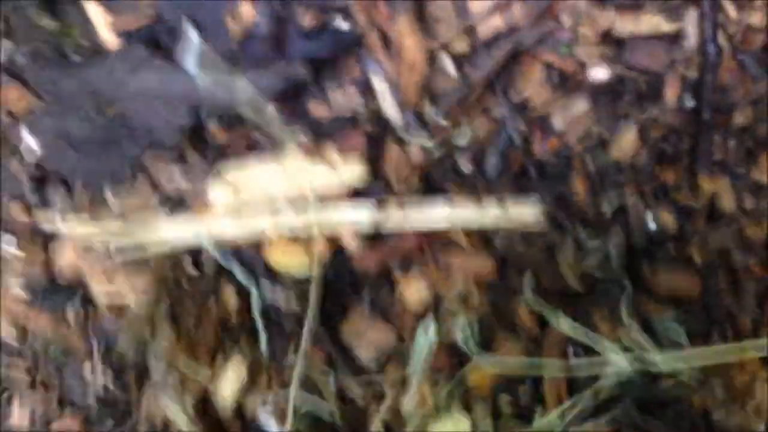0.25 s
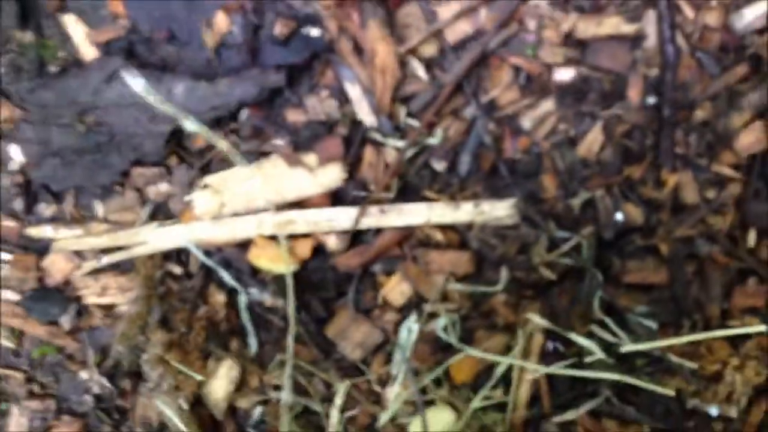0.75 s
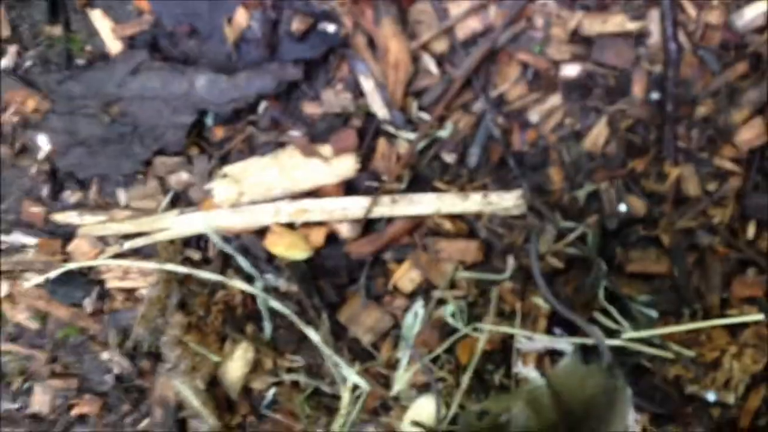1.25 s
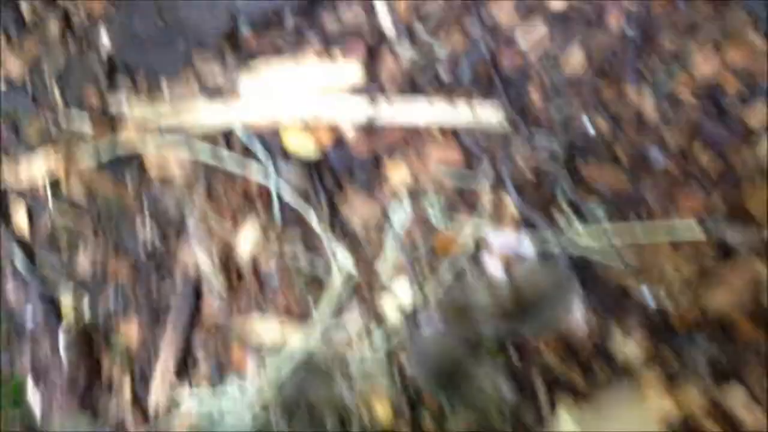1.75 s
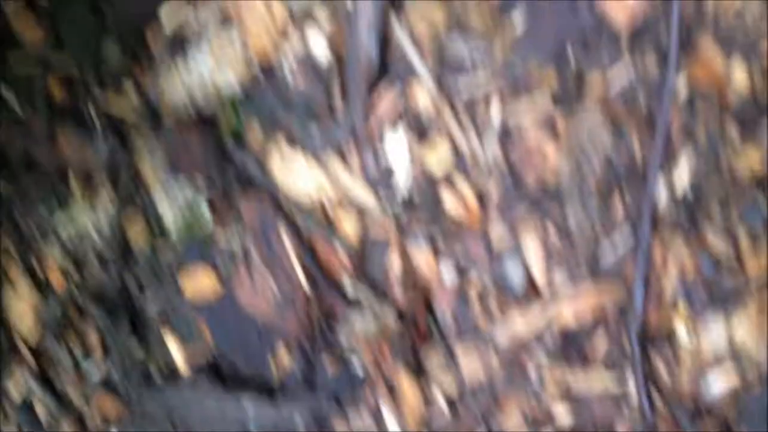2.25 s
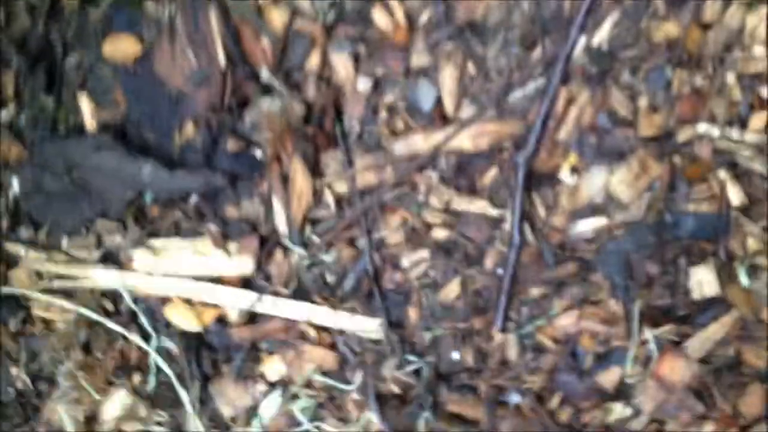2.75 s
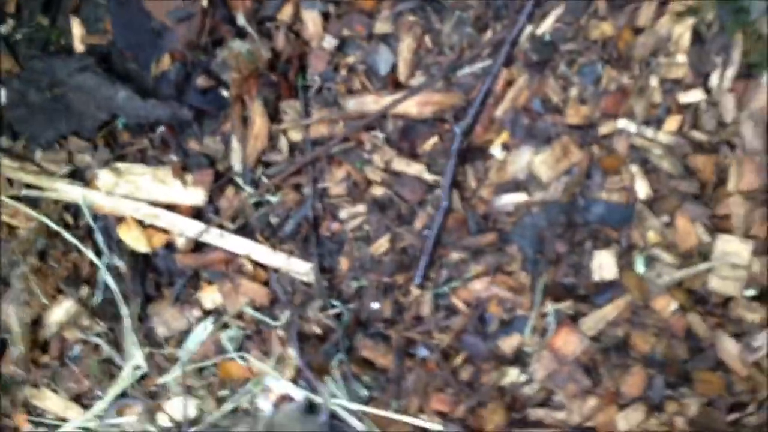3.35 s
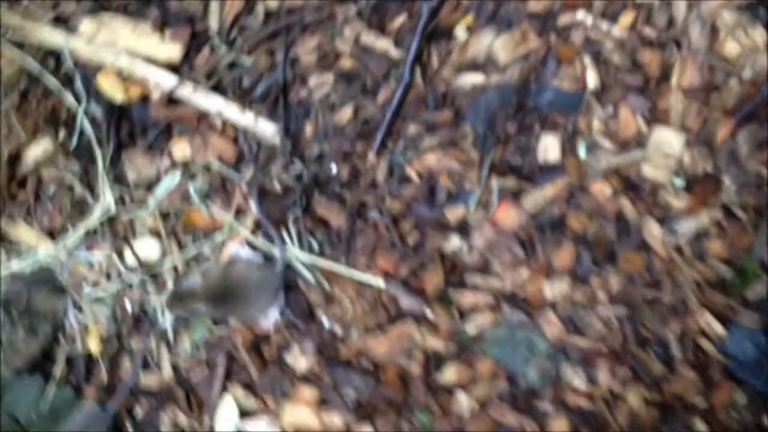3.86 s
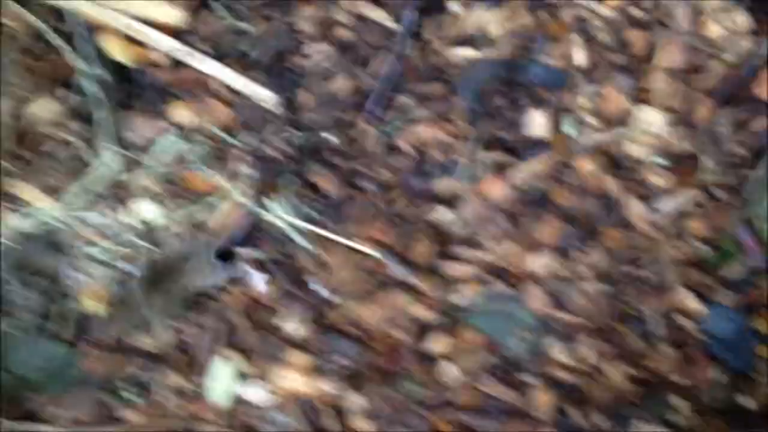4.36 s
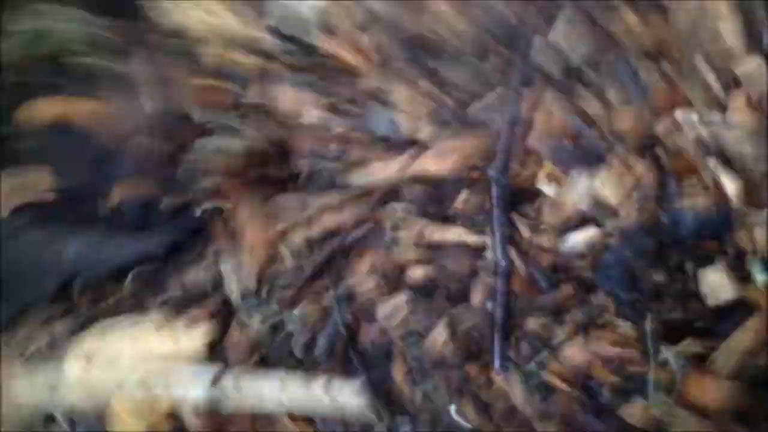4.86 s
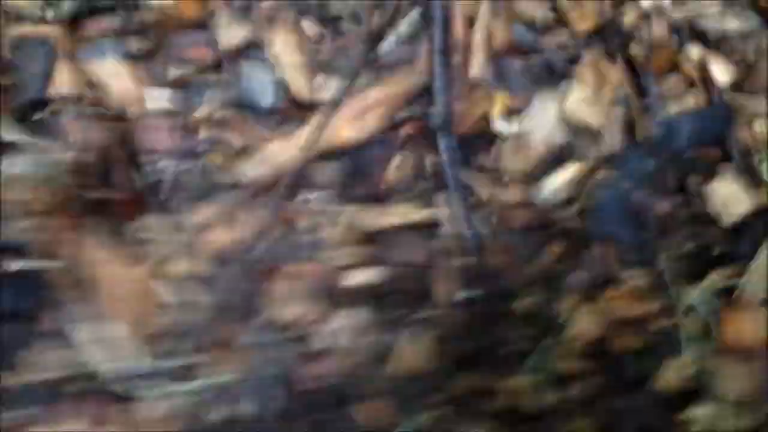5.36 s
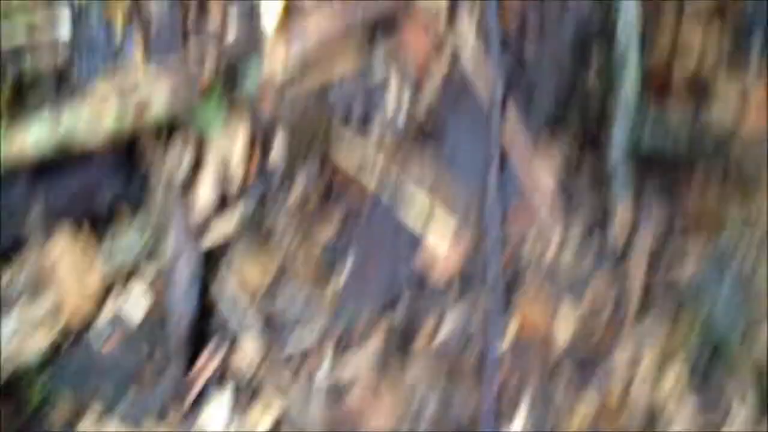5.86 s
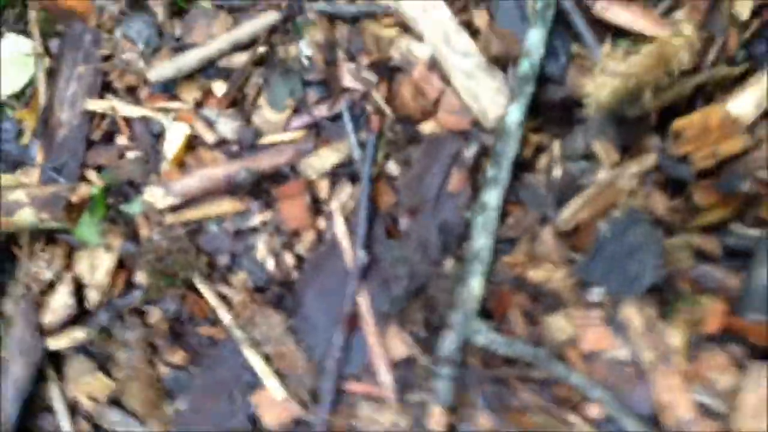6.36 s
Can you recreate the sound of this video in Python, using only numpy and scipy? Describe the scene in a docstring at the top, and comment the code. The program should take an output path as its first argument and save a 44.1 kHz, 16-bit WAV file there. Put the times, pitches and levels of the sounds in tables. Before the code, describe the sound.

Close rasping handling noise with thumps and dry clicks for a second, fading to quiet air, a far blurred bird and light rustles.

```python
"""Handled camera above bark chips and straw

A hand-held camera hovers over mice in bark chips and straw, its microphone open to quiet outdoor air.
Right at the case, fingers rub in quick strokes: random slips filtered into a rasp and a fizz.
Dull knocks are struck modes with a noise clack; small dry ticks are shaped snaps of noise.
Later come lighter scuffs and rustles from clumped slips, and murmurs and creaks of the grip.
Far off, a faint bird whistles blurred glides that echo among the trees."""
import sys
import numpy as np
from scipy import signal
from scipy.fft import rfft, irfft, next_fast_len
from scipy.io import wavfile
from scipy.ndimage import uniform_filter1d, map_coordinates

SR = 44100
rng = np.random.default_rng(int(sys.argv[2]) if len(sys.argv) > 2 else 0)


def dump_mix(stems):
    """Bounce the given channels to the path in sys.argv[1] as a 16-bit WAV at rate SR."""
    frames = np.atleast_2d(stems).T  # one column per channel
    limited = np.clip(frames, -1, 1)  # hard clip at full scale
    pcm = np.round(limited * 32767).astype(np.int16)
    wavfile.write(sys.argv[1], SR, pcm)


N = 291060  # length of the scene [samples]


def amp(db):
    """Decibels to gain."""
    return 10 ** (np.asarray(db) / 20)


def unit(x):
    """Scale to rms 1."""
    return x / np.sqrt(np.mean(x ** 2) + 1e-20)


def add(track, start_s, sound):
    """Mix a sound into the track from start_s onward."""
    start = max(round(start_s * SR), 0)
    part = sound[:N - start]
    track[start:start + len(part)] += part


def wobble(rate, count=N):
    """A smooth random curve through normally distributed knots, rate knots a second."""
    knots = rng.standard_normal(int(count * rate / SR) + 4)
    return map_coordinates(knots, [np.arange(count) * rate / SR])


def colour(x, points, peaks=()):
    """Minimum-phase filter from (Hz, dB) points plus (Hz, width Hz, dB) resonances; the result has rms 1."""
    size = 2 * next_fast_len(len(x) // 2 + 4096)
    hz = np.fft.rfftfreq(size, 1 / SR)
    point_hz, point_db = np.transpose(points)
    curve_db = np.interp(np.log(hz + 1), np.log(point_hz), point_db)
    for centre_hz, width_hz, gain_db in peaks:
        curve_db = curve_db + gain_db / (1 + (2 * (hz - centre_hz) / width_hz) ** 2)
    # folding the cepstrum onto positive time makes the filter causal
    cepstrum = irfft(np.log(amp(curve_db)))
    cepstrum[1:size // 2] *= 2
    cepstrum[size // 2 + 1:] = 0
    response = np.exp(rfft(cepstrum))
    return unit(irfft(rfft(x, size) * response)[:len(x)])


def slips(rate, spread_db, smooth):
    """Tiny stick-slip releases, rate a second and of random size, over a share of smooth friction noise."""
    happens = rng.random(N) < rate / SR
    sign = rng.choice([-1, 1], N)
    size = amp(spread_db * np.clip(rng.standard_normal(N), -2, 2))
    return unit(unit(happens * sign * size) + smooth * rng.standard_normal(N))


def strokes(rows, attack_s, sag_db_per_s, release_s):
    """Each contact presses in, eases as it slides and lifts off; one gain over time for each dB column."""
    gains = np.zeros((2, N))
    for start_s, length_s, *levels_db in rows:
        t = np.arange(int((length_s + .15) * SR)) / SR
        press = np.sin(np.pi / 2 * np.minimum(t / attack_s, 1))
        lift = np.exp(-np.maximum(t - length_s, 0) / release_s)
        shape = press * amp(-sag_db_per_s * t) * lift
        for gain, level_db in zip(gains, levels_db):
            add(gain, start_s, amp(level_db) * shape)
    return gains


def shifting(x, depth_db):
    """The contact point wanders, so broad resonances come and go within a few hundredths of a second."""
    spectrum = signal.stft(x, nperseg=512)[2]
    field = rng.standard_normal(spectrum.shape)
    # smooth twice across frequency, then twice across time
    for size, axis in [(7, 0), (7, 0), (3, 1), (3, 1)]:
        field = uniform_filter1d(field, size, axis)
    varied = spectrum * amp(depth_db * unit(field))
    return unit(signal.istft(varied, nperseg=512)[1][:N])


# spectrum shape of the outdoor air at the microphone: (frequency [Hz], relative level [dB])
AIR_SPECTRUM = [(25, -18), (65, -8.5), (100, -7.5), (140, -1.5), (190, 2.5), (280, -3), (400, -4),
                (600, -5.5), (900, -10.5), (1400, -10.5), (3200, -12), (5000, -14), (8000, -16),
                (15500, -18)]
AIR_DB = -61.5  # middle of the wavering level


def air():
    """Quiet outdoor air and microphone hiss: filtered noise whose level wavers slightly."""
    level = amp(AIR_DB + 0.23 * wobble(3.39))
    return level * colour(rng.standard_normal(N), AIR_SPECTRUM)


# firm finger strokes on the case, levels before the sag:
# (time [s], length [s], rasp level [dB], fizz level [dB])
FIRM_STROKES = [(0.0, 0.039, -36.5, -43.5), (0.05, 0.044, -42.5, -51), (0.101, 0.061, -33, -38),
                (0.207, 0.055, -37, -39), (0.256, 0.037, -30, -31.5), (0.298, 0.081, -38.5, -44),
                (0.356, 0.024, -33, -39), (0.382, 0.066, -31.5, -37), (0.488, 0.093, -31.5, -35.5),
                (0.613, 0.023, -41.5, -42), (0.648, 0.055, -32.5, -42.5), (0.712, 0.089, -38.5, -45.5),
                (0.768, 0.071, -37.5, -38), (0.858, 0.043, -34, -40), (0.895, 0.058, -38, -44),
                (0.982, 0.089, -45, -53.5), (1.083, 0.024, -41.5, -44.5), (1.13, 0.019, -47.5, -56),
                (1.18, .032, -57, -66)]
# spectrum shape of the rasp: (frequency [Hz], relative level [dB])
RASP_SPECTRUM = [(60, -24), (130, -11), (220, 1.5), (400, -8), (650, -4), (880, -5.5), (1300, -15),
                 (1600, -8.5), (2400, -1.5), (3400, -3), (5000, -10.5), (7500, -26.5)]
# resonances that the rubbing excites: (frequency [Hz], width [Hz], gain [dB])
RASP_RESONANCES = [(696, 95, 7), (1630, 230, 7.5), (2084, 110, 10), (2450, 180, 7.5), (4540, 260, 1.5)]
# spectrum shape of the fizz, also used by ticks and scuffs: (frequency [Hz], relative level [dB])
FIZZ_SPECTRUM = [(3000, -28), (5500, 0), (7000, 1.5), (8500, 4), (11500, 6), (13500, 3), (16000, -0.5)]
RUB_ATTACK_S, RUB_SAG_DB_PER_S, RUB_RELEASE_S = 0.026, 43, 0.024


def rubbing():
    """Skin drags over the case: dense slips rasp in its resonances and fizz at the microphone port."""
    rasp_gain, fizz_gain = strokes(FIRM_STROKES, RUB_ATTACK_S, RUB_SAG_DB_PER_S, RUB_RELEASE_S)
    judder = unit(amp(0.7 * wobble(110.0)))
    rasp = colour(slips(rate=1900, spread_db=4, smooth=.3), RASP_SPECTRUM, RASP_RESONANCES)
    rasp = shifting(rasp, depth_db=2.8)
    fizz = colour(slips(rate=5000, spread_db=4, smooth=.6), FIZZ_SPECTRUM)
    fizz = shifting(fizz, depth_db=2.2)
    fizz = fizz * unit(amp(1.9 * wobble(160)))
    return judder * (rasp_gain * rasp + fizz_gain * fizz)


# bumps on the case, boom and clack relative to the nominal level:
# (time [s], nominal level [dB], main pitch [Hz], boom [dB], clack [dB])
BUMPS = [(0.005, -23, 304, -21, -5.5), (0.023, -22.5, 267, -15.5, -2), (0.154, -10.5, 168.2, -10.5, -15.5),
         (0.481, -26, 690, -16, 1), (0.526, -27, 688, -18, -9), (0.646, -13, 313.5, -9, -12.5),
         (0.66, -22, 300, -8, -3), (0.683, -30, 543, -17, 0), (0.696, -23.5, 781, -23, -8.5),
         (0.74, -22, 233, -20, -8.5), (0.792, -32.5, 230, -2, -19), (0.919, -32, 720, -11.5, -3.5),
         (1.054, -26.5, 719, -11.5, -12), (1.152, -18.5, 164.6, -7, -15.5),
         (1.295, -24.5, 163, -7.5, -11.5), (1.607, -32.5, 227, -16, -11.5), (1.854, -31.5, 239, -22, -18),
         (1.983, -30, 334, -23, -27), (2.026, -25.5, 445, -42, -22), (2.033, -32, 463, -36, -12.5),
         (2.927, -54, 450, -20, 3), (3.55, -43.5, 730, -21, -12), (3.715, -43.5, 294, -34, -2.5),
         (3.851, -43, 720, -12, -11), (3.945, -41.5, 382, -16, -5), (4.021, -48, 460, -20, -7),
         (4.123, -46.5, 413, -21, -6), (4.804, -24.5, 243, -13, -10.5), (4.813, -31, 125, -8, -31),
         (5.181, -49, 194, 5, -3), (5.223, -32, 207, -11, -12.5), (5.546, -36.5, 327, -24, -14.5),
         (5.672, -43.5, 308, -17, -8), (6.036, -47, 723, -18, -6)]
# partials of a struck spot: (ratio to main pitch [1], relative level [dB], share of KNOCK_T60_S [1])
SPOT_PARTIALS = [(.78, -10.5, 1), (1.002, 2.5, 1), (1.266, -2, 0.25), (2.55, -8.5, 0.51)]
# modes of the whole case: (frequency [Hz], mean relative level [dB], t60 [s])
CASE_MODES = [(125, -2.5, 0.037), (158, 1.5, 0.086), (235, -3, 0.078), (288.6, -4.5, 0.14),
              (369, -7, 0.033), (485, -9.5, 0.08), (669, -6, 0.041), (960, -26, 0.031), (1125, -23.5, 0.15)]
# spectrum shape of the clack: (frequency [Hz], relative level [dB])
CLACK_SPECTRUM = [(100, -18.5), (300, 4.5), (600, -5.5), (1200, -5), (2000, -7), (3000, -17), (6000, -43),
                  (15000, -28.5)]
KNOCK_T60_S = 0.073


def knocking():
    """Each bump rings the struck spot at its own pitch, booms in the whole case and starts with a short clack."""
    track, t = np.zeros(N), np.arange(SR // 5) / SR
    mode_hz, mode_db, mode_t60_s = np.transpose(CASE_MODES)[:, :, None]
    ratio, partial_db, share = np.transpose(SPOT_PARTIALS)[:, :, None]
    signs = (-1) ** np.arange(len(CASE_MODES))[:, None]
    clack_onset = 1 - np.exp(-t / .0012)
    # the finger damps most of the clack at once; a weak rattle lingers
    clack_decay = amp(-60 * t / 0.0059) + 0.35 * amp(-60 * t / 0.12)
    for start_s, db, pitch_hz, boom_db, clack_db in BUMPS:
        ringing = amp(partial_db - 60 * t / (KNOCK_T60_S * share))
        partials = ringing * np.cos(2 * np.pi * pitch_hz * ratio * t)
        spot = (signs[:len(SPOT_PARTIALS)] * partials).sum(axis=0) * (1 - np.exp(-t / 0.00078))
        # every bump strikes the modes a little differently
        scatter_db = 0.57 * rng.standard_normal(mode_hz.shape)
        mode_gain = amp(mode_db + scatter_db - 60 * t / mode_t60_s)
        modes = signs * mode_gain * np.sin(2 * np.pi * mode_hz * t)
        boom = modes.sum(axis=0) * (1 - np.exp(-t / 0.0011))
        clack = clack_onset * colour(rng.standard_normal(len(t)), CLACK_SPECTRUM) * clack_decay
        add(track, start_s, amp(db - 24.5) * unit(spot))
        add(track, start_s, amp(db + boom_db - 15.5) * unit(boom))
        add(track, start_s, amp(db + clack_db + 4.5) * clack)
    return track


# dry ticks close to the microphone, the bright edge relative to the nominal level:
# (time [s], nominal level [dB], resonance [Hz], edge [dB])
DRY_TICKS = [(0.1209, -23.5, 2240, -2), (0.2285, -18.5, 2120, -19), (0.3148, -13.5, 1700, -23),
             (0.418, -18, 3360, -0.5), (0.5665, -18, 2350, -24), (0.625, -20.5, 9860, -1.5),
             (0.7002, -22.5, 3170, -8), (0.7748, -17, 2620, -14), (0.7961, -11.5, 5200, -35),
             (0.838, -17.5, 2100, -21), (0.96, -19, 2900, -23), (1.0139, -22, 2760, -28),
             (1.1108, -26.5, 2180, -17), (1.1527, -22, 2090, -8.5), (1.1641, -31, 1730, -10),
             (1.2965, -27.5, 9500, -2.5), (1.3066, -41, 2050, 0), (1.352, -42, 2240, -9),
             (1.51, -51, 1990, 0), (1.6058, -39, 1620, -31), (3.271, -40, 2040, -4),
             (3.7185, -46, 2160, -21), (3.952, -35.5, 1910, -16), (3.9786, -36.5, 2060, -11),
             (4.148, -39, 2500, -21), (4.539, -37.5, 2360, -24), (4.551, -34.5, 2730, -25),
             (4.87, -32, 4170, -21), (4.8923, -34.5, 3740, -1), (4.9516, -33, 1450, -22),
             (5.006, -49.5, 10700, 2), (5.048, -38.5, 2760, -15), (5.1174, -24, 2750, -36),
             (5.2204, -26, 2670, -26), (5.226, -26, 2540, -27), (5.4957, -45, 1920, -1),
             (5.553, -36.5, 2350, -12), (5.876, -36.5, 2450, -17)]
TICK_RISE_S, TICK_T60_S = 0.0024, 0.022


def ticking():
    """Small dry snaps: a short scrape builds up and lets go, with one broad resonance and a bright edge."""
    track, lead_s = np.zeros(N), .015
    t = np.arange(SR // 14) / SR - lead_s
    since_snap = t - .0018
    build_up = np.exp(np.minimum(since_snap, 0) / TICK_RISE_S)
    envelope = build_up * amp(-60 * np.maximum(since_snap, 0) / TICK_T60_S)
    body_points = [(100, -26), (500, -19.0), (2200, -4.5), (4000, -5.5), (9000, -18)]  # (Hz, dB)
    for start_s, db, pitch_hz, edge_db in DRY_TICKS:
        body = colour(rng.standard_normal(len(t)), body_points, [(pitch_hz, 900, 9)])
        edge = colour(rng.standard_normal(len(t)), FIZZ_SPECTRUM)
        tick = envelope * (amp(db - 13.5) * body + amp(db + edge_db - 7) * edge)
        add(track, start_s - lead_s, tick)
    return track


# light scuffs and rustles at the case, levels before the sag:
# (time [s], length [s], rustle level [dB], fizz level [dB])
LIGHT_SCUFFS = [(1.246, 0.038, -52, -57), (1.825, 0.072, -56, -61.5), (1.9, 0.19, -64.5, -75),
                (3.245, 0.082, -75, -64), (3.9, 0.11, -63.5, -64.5), (4.07, 0.019, -54, -56.5),
                (4.2, .04, -60, -62), (4.265, .06, -62.5, -66), (4.345, 0.033, -64, -63),
                (4.64, 0.029, -55, -60.5), (4.68, 0.07, -64, -76), (4.75, 0.083, -55, -56.5),
                (4.8, 0.091, -52.5, -59), (4.9, 0.018, -59, -58), (4.955, 0.031, -52, -58),
                (5.055, 0.074, -52.5, -59), (5.145, .09, -56, -56.5), (5.28, 0.024, -52.5, -59.5),
                (5.37, .035, -69, -62), (5.43, 0.066, -70, -67), (5.658, 0.041, -57, -60),
                (5.73, 0.053, -61.5, -65), (6.41, 0.081, -63.5, -73)]
# spectrum shape of the rustle: (frequency [Hz], relative level [dB])
RUSTLE_SPECTRUM = [(70, -11), (180, 1.5), (500, 6), (800, 4.5), (1300, 4), (2000, 2.5), (2700, 3),
                   (4200, 0), (5500, -3.5), (8000, -44)]
SCUFF_ATTACK_S, SCUFF_SAG_DB_PER_S, SCUFF_RELEASE_S = 0.023, 7, 0.02


def scuffing():
    """Light contact: slips whose strength swells in clumps, heard as a rustle and a fizz."""
    rustle_gain, fizz_gain = strokes(LIGHT_SCUFFS, SCUFF_ATTACK_S, SCUFF_SAG_DB_PER_S, SCUFF_RELEASE_S)
    clumps = amp(2.1 * wobble(130))
    rustle = colour(clumps * slips(rate=2200, spread_db=4, smooth=.5), RUSTLE_SPECTRUM)
    rustle = shifting(rustle, depth_db=3.3)
    fizz = colour(clumps * slips(rate=5300, spread_db=14, smooth=0.91), FIZZ_SPECTRUM)
    return rustle_gain * rustle + fizz_gain * fizz


# far bird notes, pitches before the arch, blur as random knots a second, level before swell and echo:
# (time [s], length [s], start pitch [Hz], end pitch [Hz], blur rate [1/s], level [dB])
BIRD_NOTES = [(1.314, 0.15, 2350, 2130, 530, -63.5), (1.485, 0.11, 2020, 1664, 380, -64.5),
              (1.691, 0.28, 2175, 2025, 300, -64.5), (1.894, 0.18, 3180, 3470, 302, -67.5),
              (2.071, 0.14, 1950, 1906, 141, -65), (2.199, 0.079, 2654, 2620, 170, -66),
              (2.34, 0.036, 2640, 2720, 150, -69), (2.243, .15, 2320, 2240, 295, -62),
              (2.38, 0.16, 2180, 2130, 312, -68.5), (2.545, .25, 2550, 3545, 1380, -67),
              (2.799, 0.24, 3910, 3730, 203, -69.5), (2.743, 0.3, 3060, 3020, 250, -76),
              (3.14, 0.2, 2120, 2030, 248, -79), (3.86, 0.091, 2620, 2900, 200, -67),
              (4.093, 0.071, 2660, 2540, 200, -72), (4.202, 0.036, 2510, 2650, 210, -63),
              (4.29, 0.11, 2730, 2830, 294, -68), (4.438, 0.12, 3450, 4050, 139, -73),
              (4.56, 0.086, 2820, 2880, 607, -68), (5.248, .13, 1900, 1930, 150, -69),
              (5.391, 0.16, 1950, 2000, 170, -74), (5.655, 0.14, 2000, 1670, 202, -68),
              (5.925, 0.15, 1880, 2190, 241, -67), (6.033, 0.19, 2210, 2116, 262, -65.5),
              (6.25, 0.14, 1950, 1700, 198, -73), (6.368, 0.18, 2240, 2640, 345, -64)]
ARCH_HZ_PER_S = 280  # the longer a note, the higher its middle bows up


def bird():
    """Whistled glides, blurred into narrow bands by distance and by echoes among the trees."""
    song = np.zeros(N)
    for start_s, length_s, start_hz, end_hz, blur_rate, db in BIRD_NOTES:
        u = np.linspace(0, 1, int(length_s * SR))
        arch = ARCH_HZ_PER_S * length_s * np.sin(np.pi * u)
        pitch_hz = start_hz + (end_hz - start_hz) * u + arch
        scatter = wobble(blur_rate, count=len(u)) + 1j * wobble(blur_rate, count=len(u))
        whistle = np.exp(2j * np.pi * np.cumsum(pitch_hz) / SR)
        note = unit((scatter * whistle).real)
        swell = np.sqrt(np.abs(np.sin(np.pi * u)))
        add(song, start_s, amp(db) * swell * note)
    t = np.arange(SR // 2) / SR
    trees = rng.standard_normal(len(t)) * amp(-60 * t / 1.5)
    echoes = signal.fftconvolve(song, trees / np.linalg.norm(trees))[:N]
    return song + amp(-3.5) * echoes


# grip shifts of the holding hand, levels before the sag:
# (time [s], length [s], murmur level [dB], creak level [dB])
GRIP_SHIFTS = [(1.605, 0.075, -45, -61.5), (1.688, 0.094, -59, -62), (1.8, 0.058, -54, -61),
               (1.855, 0.08, -51.5, -53.5), (1.955, 0.13, -47, -50), (2.08, 0.029, -57, -63),
               (5.11, 0.032, -56.5, -67), (5.174, 0.086, -60, -54.5), (5.372, 0.023, -70, -58.5),
               (5.448, 0.054, -62.5, -68)]
# spectrum shape of the murmur: (frequency [Hz], relative level [dB])
MURMUR_SPECTRUM = [(60, -23.5), (125, 5.5), (170, -10.5), (240, 12), (300, 6.5), (360, -6), (600, -34.5)]
# spectrum shape of the creak: (frequency [Hz], relative level [dB])
CREAK_SPECTRUM = [(250, -11.5), (360, -2.5), (440, 3.5), (560, -3.5), (780, -23.5), (1130, -9), (1350, -27),
                  (1600, -8.5), (2500, -27), (5000, -40)]
GRIP_ATTACK_S, GRIP_SAG_DB_PER_S, GRIP_RELEASE_S = 0.0095, 53, 0.0098


def gripping():
    """Slow slips of the holding hand murmur in the low modes; a tighter grip creaks higher."""
    murmur_gain, creak_gain = strokes(GRIP_SHIFTS, GRIP_ATTACK_S, GRIP_SAG_DB_PER_S, GRIP_RELEASE_S)
    drive = slips(rate=400, spread_db=-1.0, smooth=0.32)
    murmur = colour(drive, MURMUR_SPECTRUM)
    creak = colour(drive, CREAK_SPECTRUM)
    return murmur_gain * murmur + creak_gain * creak


def scene():
    """All sources, near and far, at one microphone."""
    return (air() + rubbing() + knocking() + ticking() + scuffing() + bird() + gripping())[None]


TOP_HZ = 15600  # band limit of the camera


def record(dry):
    """The camera thins the deep bass and keeps nothing above its band limit."""
    bass_cut = signal.butter(3, 85, "highpass", fs=SR, output="sos")
    thin = signal.sosfilt(bass_cut, dry)
    kept = np.fft.rfftfreq(N, 1 / SR) < TOP_HZ
    return irfft(rfft(thin) * kept, N)


dry = scene()
out = record(dry)
dump_mix(out)
```